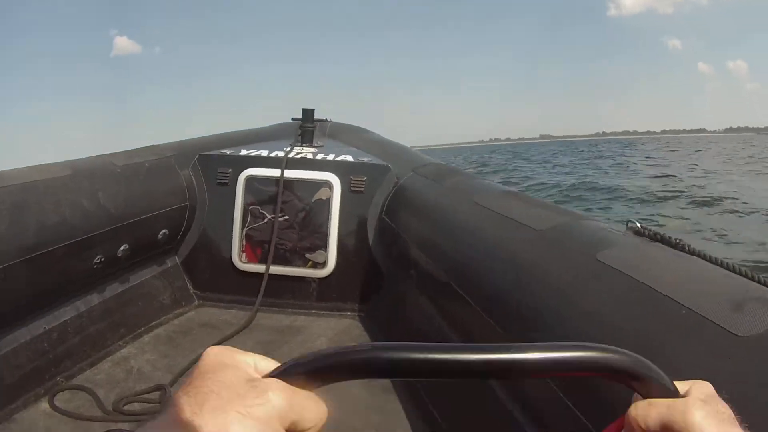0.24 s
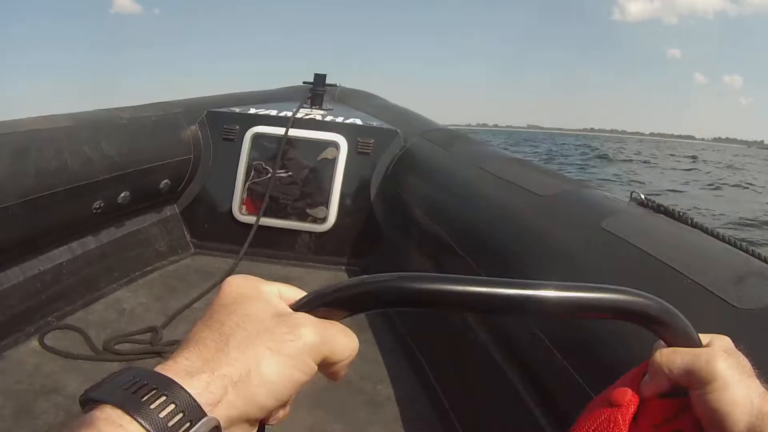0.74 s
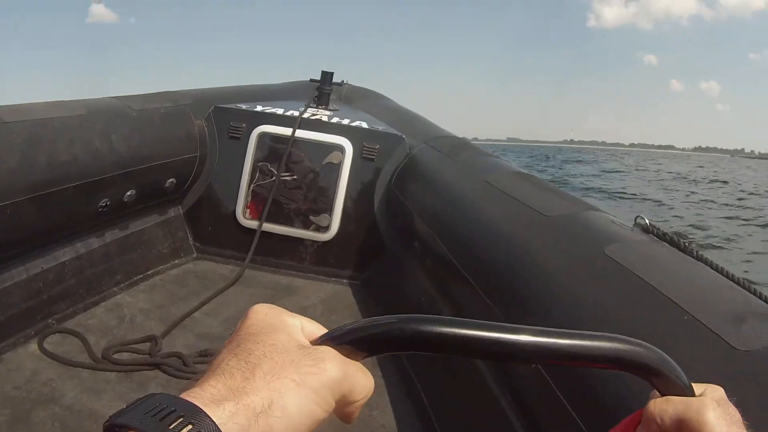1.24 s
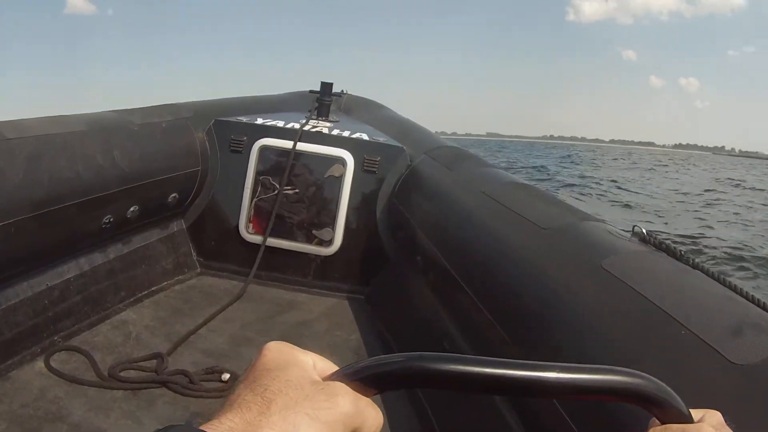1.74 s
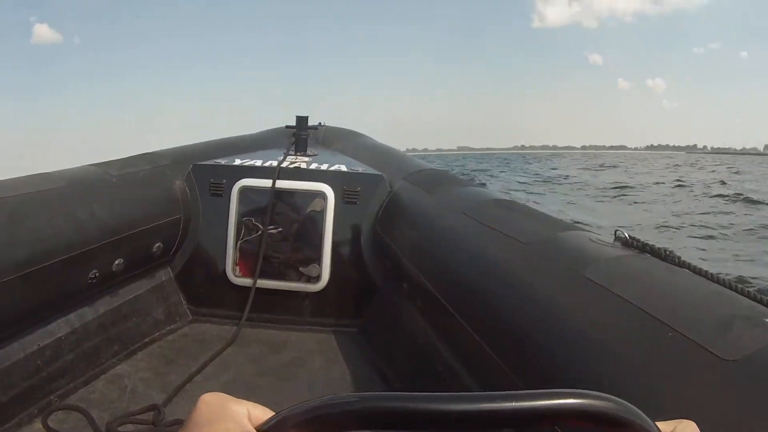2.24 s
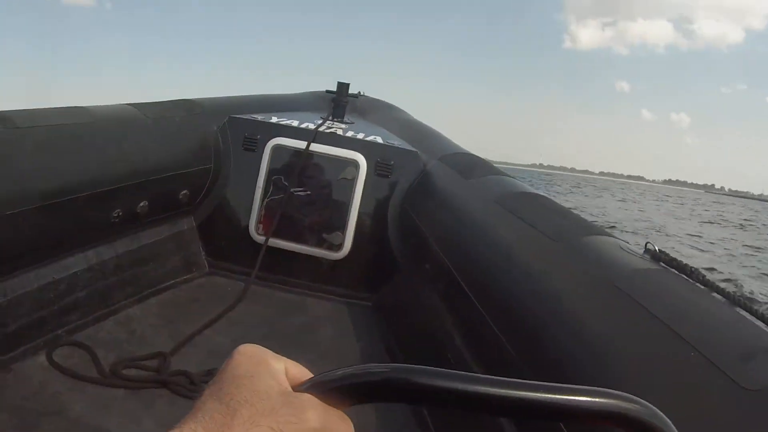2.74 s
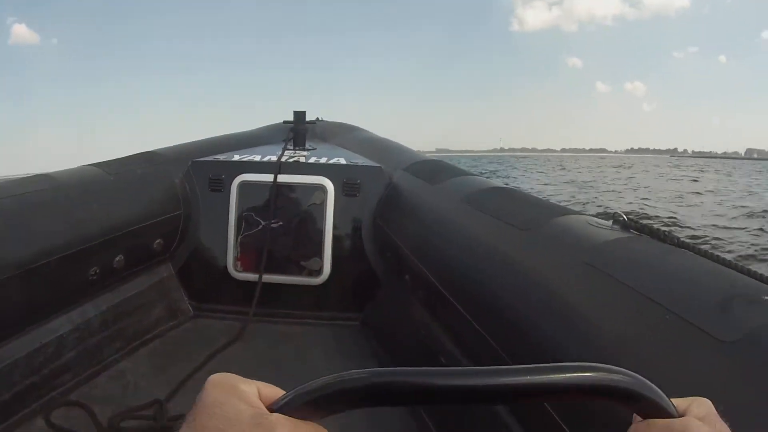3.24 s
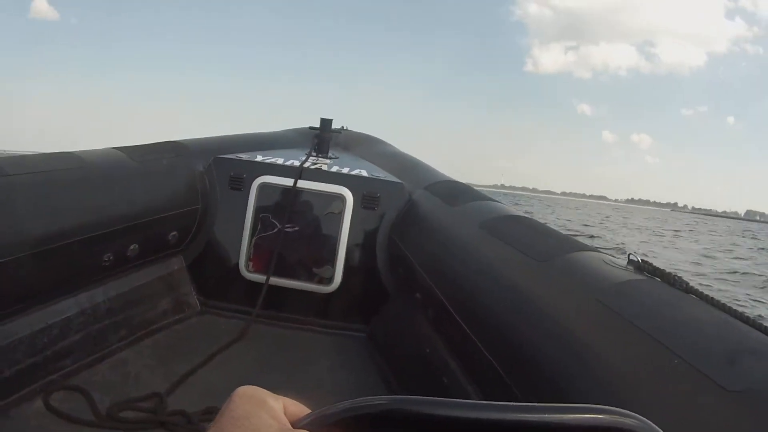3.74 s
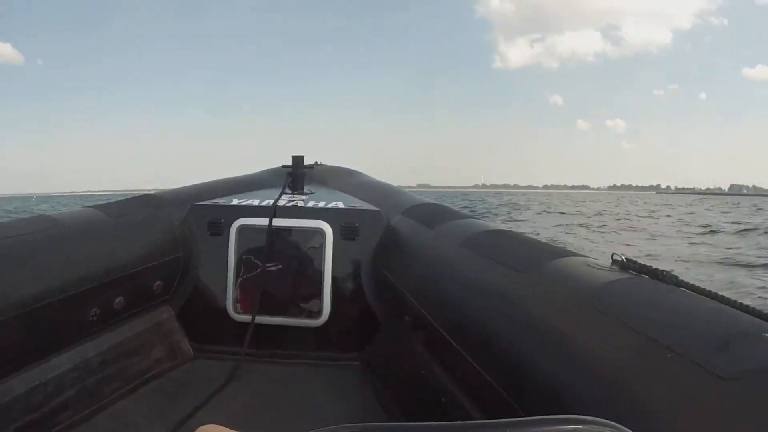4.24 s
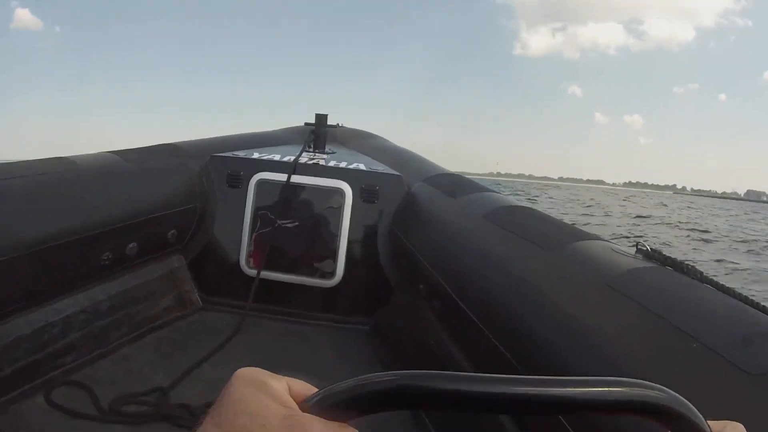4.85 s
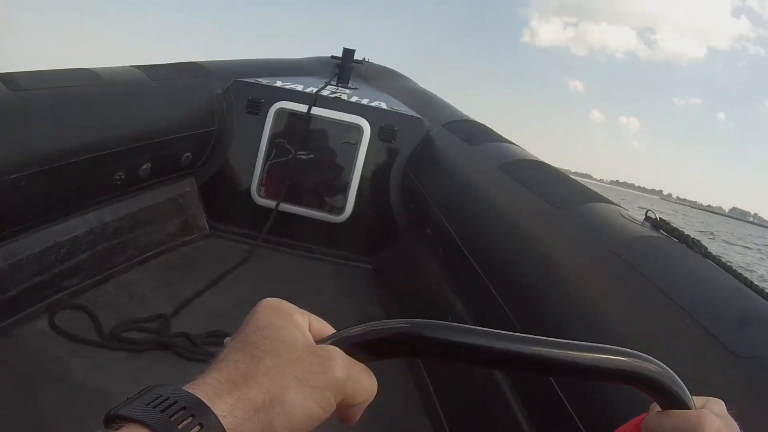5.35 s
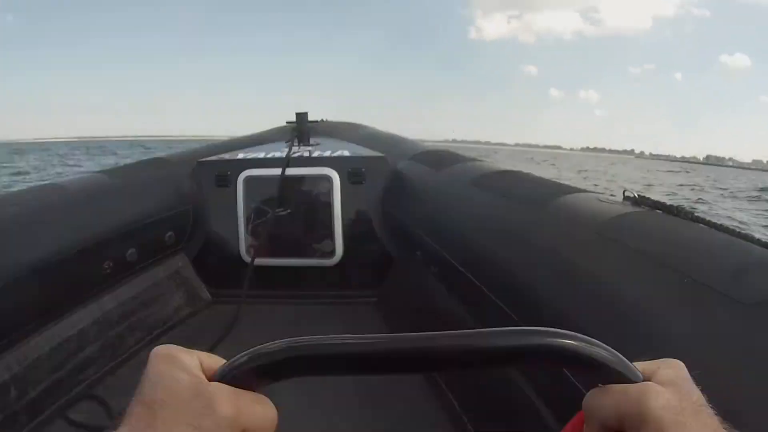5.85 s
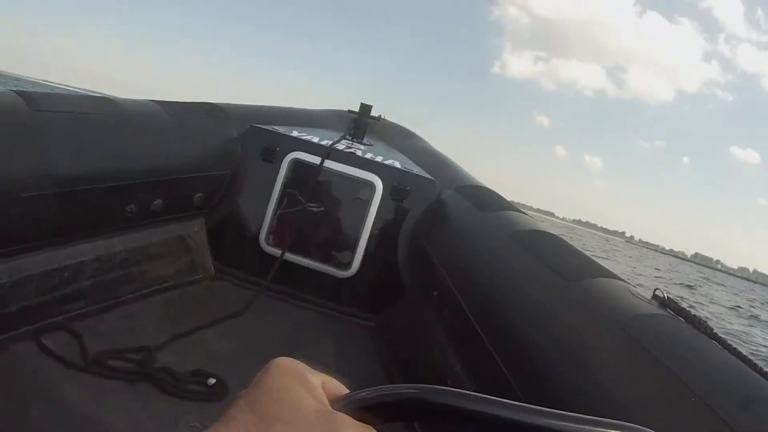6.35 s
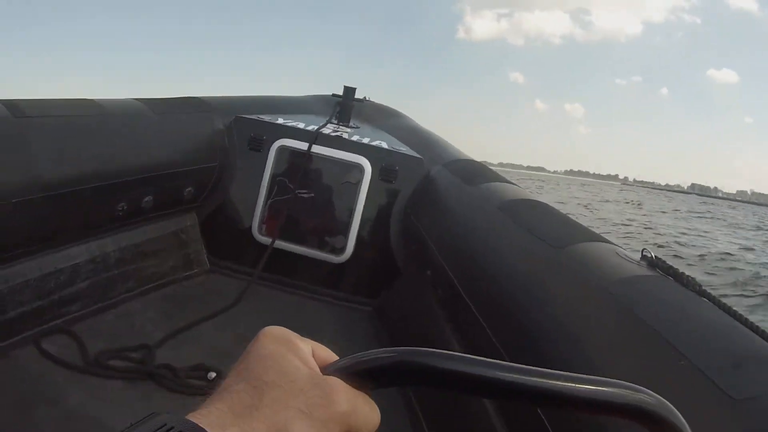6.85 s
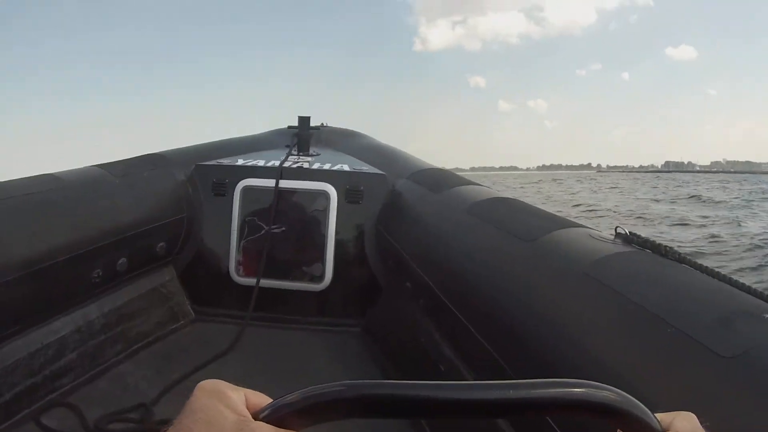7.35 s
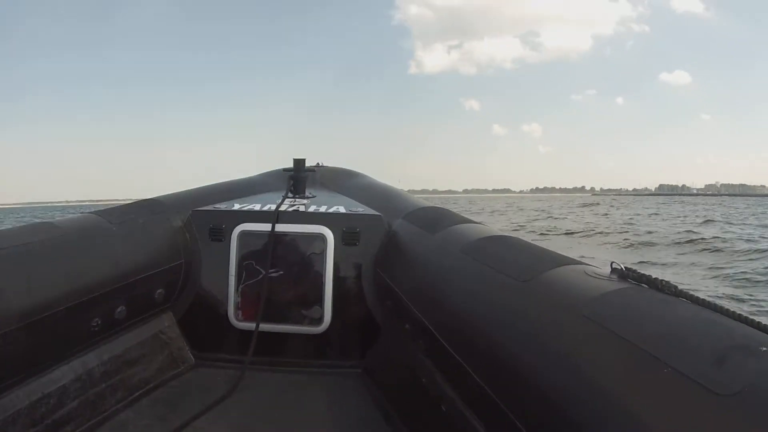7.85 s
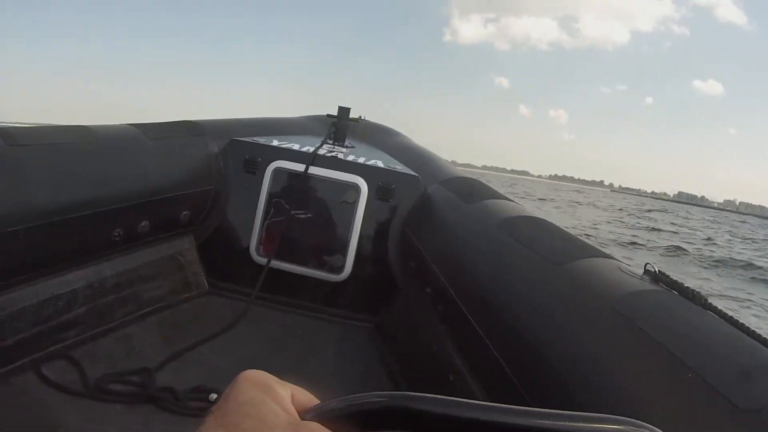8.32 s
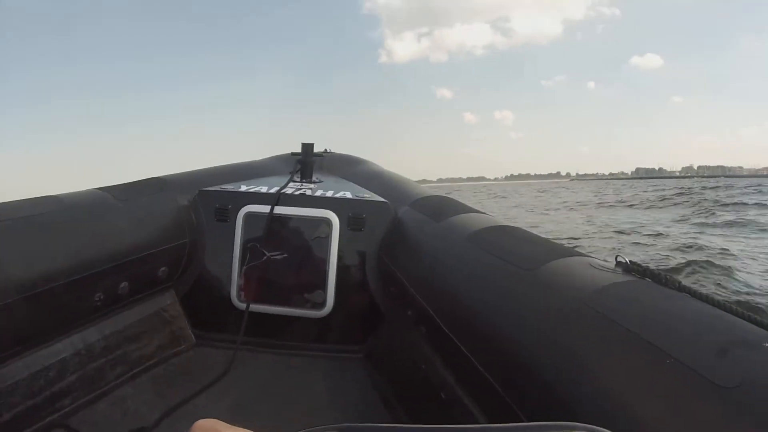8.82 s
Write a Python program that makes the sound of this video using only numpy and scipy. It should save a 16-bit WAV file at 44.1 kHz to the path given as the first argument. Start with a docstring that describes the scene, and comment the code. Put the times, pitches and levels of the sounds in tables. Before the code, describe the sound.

Inside a sealed plastic case, a small motorboat drones over muffled wind and rushing water while hard, dry, clipping knocks and hull thuds hit irregularly.

```python
"""Planing boat in chop, heard inside a waterproof case

A small planing boat runs through chop, heard by a body-worn camera shut in a waterproof case.
Shaped noise makes the wind and water, sines the outboard's hum; the case lends noise and knocks its resonances.
As the hull bounces, the case knocks on the rider's gear: dry, overloading impulses, some with a metal ring.
Water swells with each wave; hard knocks make the camera's limiter duck everything, and the drone creeps back.
"""
import sys
import numpy as np
from scipy import signal
from scipy.fft import rfft, irfft
from scipy.io import wavfile
from scipy.ndimage import uniform_filter1d

SR = 44100
rng = np.random.default_rng(int(sys.argv[2]) if len(sys.argv) > 2 else 0)


def int16_out(signal):
    """Quantize to a 16-bit WAV file."""
    q = np.round(np.clip(np.atleast_2d(signal).T, -1, 1) * 32767)
    wavfile.write(sys.argv[1], SR, q.astype(np.int16))


N = 400428
TIME = np.arange(N) / SR


def amp(db):
    """Decibels to gain."""
    return 10 ** (np.asarray(db) / 20)


def unit(x):
    """Scales to rms 1."""
    return x / np.sqrt(np.mean(x ** 2) + 1e-20)


def read(points, hz):
    """Joins (frequency [Hz], value) points on a log-frequency axis."""
    f, value = np.transpose(points)
    return np.interp(np.log(hz + 1), np.log(f + 1), value)


def curve(rows, axis):
    """One column of a time table, at every sample."""
    rows = np.array(rows)
    return np.interp(TIME, rows[:, 0], rows[:, axis])


def add(mix, s, sound):
    """Lays a sound into the mix at time s."""
    part = mix[max(round(s * SR), 0):][:len(sound)]
    part += sound[:len(part)]


def wander(hz):
    """Random drift of rms 1, rolling off steeply above hz."""
    f = np.fft.rfftfreq(N, 1 / SR)
    spectrum = rfft(rng.standard_normal(N)) / (1 + (f / hz) ** 4)
    return unit(irfft(spectrum, N))


# resonances of the plastic case: (centre [Hz], width [Hz], lift [dB])
CASE_RESONANCES = [(699, 323, 8.5), (1307, 267, 15.5), (1588, 346, 15), (2090, 467, 11.5), (2377, 464, 15),
                   (3810, 2700, 6), (4876, 680, 10), (6230, 690, 5.5), (7240, 580, 2.5)]


def case_db(hz):
    """The lift that the case's resonances give to a sound passing through it."""
    return sum(db / (1 + (2 * (hz - f) / width) ** 2) for f, width, db in CASE_RESONANCES)


def below(hz, edge_hz=950):
    """Low-frequency weighting that slides from 1 to 0 around the edge."""
    return 1 / (1 + (hz / edge_hz) ** 6)


def response(db):
    """Minimum-phase impulse response of a dB spectrum, so the energy comes early."""
    log_gain = np.log(amp(np.maximum(db, db.max() - 100)))
    circle = np.r_[log_gain, log_gain[-2:0:-1]]  # mirrored to negative frequencies
    return np.fft.ifft(np.exp(np.conj(signal.hilbert(circle)))).real


def through_case(x, tone, weight_db=0, size=4096):
    """Gives a drive signal its spectrum and the colour of the case."""
    hz = np.fft.rfftfreq(size, 1 / SR)
    spectrum_db = read(tone, hz) + case_db(hz) + weight_db * below(hz)
    return signal.fftconvolve(x, response(spectrum_db))


def swell(crest, length, rise_share=1, fall_share=0.98):
    """A rounded rise and fall of height 1; the shares scale its length before and after the crest."""
    t = (TIME - crest) / length
    side = np.where(t < 0, t / rise_share, t / fall_share)
    return np.exp(1 - np.hypot(1, 2 * side))


def surge(rows):
    """Gain of a steady flow whose power gains that of each (crest [s], level [dB], length [s]) swell."""
    return np.sqrt(1 + sum((amp(db) * swell(s, length)) ** 2 for s, db, length in rows))


# gusts on the case: (crest [s], level [dB re steady wind], length [s])
GUSTS = [(.27,4,.12), (.76,4.5,0.15), (1.15,-4.5,0.11), (1.33,7,0.066), (1.93,9.5,0.11), (2.5,3.5,.14),
         (3.08,9,0.07), (4.17,6.5,0.13), (5.1,4.5,0.28), (5.8,10.5,.1), (6.08,11.5,0.076), (6.98,11.5,.07),
         (7.2,9.5,0.09), (8.07,2.5,0.22), (8.98,2,0.25)]
# wind spectrum before the case colours it: (frequency [Hz], relative level [dB per Hz])
WIND_TONE = [(8, -6.5), (22, -5.5), (35, 3.5), (70, -4.5), (100, -4.5), (150, -9), (220, -16), (320, -26),
             (600, -46), (1500, -69.5)]


def wind(level_db=-32.5, flutter_db=2):
    """Lumpy turbulence pressing on the case: low noise with a fluttering level and gusts."""
    noise = through_case(rng.standard_normal(N), WIND_TONE)[:N]
    rumble = unit(noise * amp(flutter_db * wander(18.0)))
    return rumble * amp(level_db) * surge(GUSTS)


# waves along the hull:
# (crest [s], level [dB re calm water], length [s], extra slosh [dB], extra spray [dB])
WAVES = [(0.14,3,0.065,-20,2.5), (0.29,3.5,0.12,2,-15), (0.802,9.5,0.22,-1.5,0.5), (.915,11,0.031,-7,3),
         (1.318,11.5,0.019,4,0), (1.588,5,0.03,-10,-4), (1.93,8.5,0.047,-3,-5), (2.147,3,0.15,4,0),
         (2.391,8.5,0.074,3.5,-4), (2.586,6.5,.05,-3,1), (3.096,12.5,.06,-9,-1),
         (3.261,8.5,0.072,8.5,-19.5), (4.197,11,0.068,2,-3), (4.78,3.5,0.079,8,-16), (4.963,7.5,0.2,1,-21),
         (5.872,22.5,0.061,-6,-4.5), (6.1,17,0.14,-0.5,-7.5), (6.358,13,0.084,-4,-4),
         (6.783,2.5,0.062,4,-4.5), (7.224,10,0.09,2,-5.5), (7.504,5.5,0.029,9,-12.5),
         (7.71,10,0.089,-15,3.5), (8.084,14.5,0.075,3.5,-7), (8.253,4.5,.12,4.5,-3), (8.93,-6,0.31,6,0)]


def wave_gains():
    """Swelling gains of the rush, slosh and spray: the same waves, each with its own emphasis."""
    rush = surge([(s, db, length) for s, db, length, _, _ in WAVES])
    slosh = surge([(s, db + extra, length) for s, db, length, extra, _ in WAVES])
    spray = surge([(s, db + extra, length) for s, db, length, _, extra in WAVES])
    return rush, slosh, spray


def patter(per_s, spread_db):
    """A dense train of drop impacts, a few of them large."""
    size = amp(spread_db * np.minimum(rng.exponential(1, N), 4))
    hits = rng.random(N) < per_s / SR
    return unit(size * rng.standard_normal(N) * hits)


def mottle(x, depth_db, size=512):
    """Turbulence: patches of the spectrum swell and fade on their own."""
    z = signal.stft(x, nperseg=size)[2]
    patches = uniform_filter1d(rng.standard_normal(z.shape), 4, axis=0)  # across frequency
    patches = unit(uniform_filter1d(patches, 5, axis=1))  # across time
    return unit(signal.istft(z * amp(depth_db * patches), nperseg=size)[1][:N])


# water spectra before the case colours them: (frequency [Hz], relative level [dB per Hz])
SLOSH_TONE = [(100, -19), (220, 1.5), (300, 2), (450, -2.5), (700, -13), (1000, -11.5), (1400, -23.5),
              (3000, -65.5)]
RUSH_TONE = [(500, -18.5), (900, -11.5), (1200, -4.5), (1850, -4.5), (2400, -7.5), (2900, -6), (3700, -9),
             (5000, -37), (9000, -58)]
SPRAY_TONE = [(1500, -35.5), (3200, 4), (4300, -3.5), (5500, -3.5), (8000, -3.5), (10000, -12.5),
              (13000, -15), (15000, -22), (16500, -20.5)]
CALM_SLOSH_DB, CALM_RUSH_DB, CALM_SPRAY_DB = -44, -46, -60.5


def water(rush_gain, slosh_gain, spray_gain, fizz_db=2.1, churn_db=1.4, patchy_db=1.9, drops=0.7):
    """Slosh, rush and spray churn together and swell with each wave; drops give the upper two their grain."""
    drive = rng.standard_normal(N) + drops * patter(per_s=650, spread_db=8.0)
    slosh = mottle(through_case(rng.standard_normal(N), SLOSH_TONE), patchy_db)
    rush = mottle(through_case(drive, RUSH_TONE), patchy_db)
    spray = mottle(through_case(drive[::-1], SPRAY_TONE), patchy_db)  # reversed, so its grain differs
    slosh = slosh * amp(CALM_SLOSH_DB) * slosh_gain
    rush = rush * amp(CALM_RUSH_DB) * rush_gain
    spray = spray * amp(CALM_SPRAY_DB + fizz_db * wander(60)) * spray_gain
    return (slosh + rush + spray) * amp(churn_db * wander(22))


# outboard: (time [s], firing rate [Hz])
ENGINE = [(0, 211.9), (1.4, 214), (3.6, 215.3), (5.2, 216.1), (8.3, 216.3), (8.55, 230.9), (9.08, 239.6)]
# engine orders: (multiple of the firing rate, relative level [dB])
ENGINE_ORDERS = [(.5, -14), (1, 0.5), (2, -26.5), (4, -22.5)]


def outboard(level_db=-42, waver=0.005, throb_db=2.2):
    """Only the lowest engine orders get through the case, as sines; the throttle opens near the end."""
    rate_hz = curve(ENGINE, axis=1) * (1 + waver * wander(21))
    cycles = np.cumsum(rate_hz) / SR
    hum = sum(amp(db) * np.sin(2 * np.pi * (order * cycles + rng.random())) for order, db in ENGINE_ORDERS)
    return unit(hum) * amp(level_db + throb_db * wander(4.3))


# spectrum of taps and splashes before the case colours it: (frequency [Hz], relative level [dB per Hz])
SPLASH_TONE = [(40, -9.5), (200, -9.5), (600, -3.5), (1050, -8.5), (1850, -11), (2800, -19), (5000, -36),
               (9000, -48.5), (15000, -72)]


def taps(rush_gain, per_s=20, level_db=-13):
    """Scattered light impulses on the case, stronger when the water runs rough; level is re the calm rush."""
    impacts = rng.uniform(-1, 1, N) * (rng.random(N) < per_s / SR)
    return unit(through_case(impacts, SPLASH_TONE)[:N]) * rush_gain * amp(CALM_RUSH_DB + level_db)


def burst(db, length, tone, weight_db=0):
    """A short rounded burst of turbulence on the case, at rms level db."""
    count = max(int(length * SR), 64)
    drive = rng.standard_normal(count) * signal.windows.tukey(count, .5)
    sound = through_case(drive, tone, weight_db)
    return amp(db) * sound * np.sqrt(count / np.sum(sound ** 2))


# slaps of spray and short scuffs on the case:
# (time [s], level [dB], length [s], spectral weight below about 1 kHz [dB])
SPLASHES = [(0.151,-28.5,0.012,-3), (0.237,-26.5,0.027,20.5), (0.718,-28.5,0.027,17), (0.784,-25.5,0.034,7),
            (2.112,-32,0.017,8), (2.405,-20,0.022,12.5), (3.04,-22.5,.015,10), (3.086,-22,0.02,12),
            (3.228,-23,0.024,27), (4.74,-28,0.026,12.5), (4.947,-21,0.035,12), (5.033,-29.5,0.0089,-1),
            (5.832,-20.5,0.018,-6), (5.892,-21.5,0.027,-21), (5.958,-15,0.039,-10.5),
            (6.112,-23.5,0.014,15), (7.045,-31.5,.025,25), (8.166,-23,0.046,-6)]


def splashes():
    """Spray slaps and scuffs: short noise bursts, each with its own low-end weight."""
    out = np.zeros(N)
    for s, db, length, weight_db in SPLASHES:
        add(out, s, burst(db, length, SPLASH_TONE, weight_db))
    return out


# thuds of the hull on a wave: (time [s], level [dB], length [s])
THUDS = [(.24,-24,0.044), (0.814,-20.5,0.024), (1.556,-24.5,0.024), (2.563,-24.5,0.034), (4.142,-16,0.032),
         (5.824,-11.5,0.049), (5.897,-9,0.018), (8.054,-18,0.039)]
# hollow thud spectrum with two broad booms, before the case: (frequency [Hz], relative level [dB per Hz])
THUD_TONE = [(10, -24), (35, -3), (52, 3), (72, -2.5), (110, -11), (140, -1.5), (175, -15), (260, -20),
             (600, -33.5), (1500, -73.5)]


def thuds():
    """Dull thuds as the hull meets the chop: short bursts of low noise."""
    out = np.zeros(N)
    for s, db, length in THUDS:
        add(out, s, burst(db, length, THUD_TONE))
    return out


def disperse(x, hz=1600, width_hz=1900):
    """Bending waves cross the shell at unequal speeds (an allpass), so a knock builds over its first cycles."""
    r = np.exp(-np.pi * width_hz / SR)
    poles = [1, -2 * r * np.cos(2 * np.pi * hz / SR), r * r]
    return signal.lfilter(poles[::-1], poles, x)


def ring(modes):
    """Struck modes dying away, from (frequency [Hz], level [dB], t60 [s]) rows."""
    t = np.arange(SR // 2) / SR
    return sum(amp(db - 60 * t / t60) * np.sin(2 * np.pi * hz * t) for hz, db, t60 in modes)


# knocks on the case: (time [s], relative force [dB], hardness: lift around 2.2 kHz, a little above it [dB],
# spectral weight below about 1 kHz [dB], rebound delay [s])
KNOCKS = [(0.297,5,-8.5,-2.5,0.00063), (0.4343,-12,5,15,0.0017), (0.4429,-5,-11,-4.5,0.0011),
          (.455,19,7.5,-6.5,0.0011), (0.4611,10,-7,1,0.0007), (0.664,3,1,2.5,.00066),
          (0.7975,-1.5,1.5,9,0.0014), (1.603,16,-12.5,-20.5,0.00043), (1.6358,4,7.5,4.5,.0015),
          (1.7033,-11.5,7,12,.0015), (1.7752,-2,-14,-1,0.0007), (1.9203,5.5,7,2.5,.0013),
          (2.164,-16,4,-17,0.00041), (2.2319,-3,2.5,10,.0019), (2.4019,-10.5,2,3,0.0022),
          (2.6342,-15.5,-1,-2,0.00046), (2.661,17,3.5,-2,0.0014), (2.6729,9.5,-2,2.5,0.0013),
          (2.7725,-13,4,13,0.00029), (3.115,18.5,3.5,-1.5,0.00052), (3.3841,0,4,8,0.0023),
          (3.4614,15.5,1.5,3,0.0017), (3.572,-14.5,4,21,.0013), (4.1937,2.7,1.5,3.5,0.00051),
          (4.3094,7,-3,3.5,0.0021), (4.6134,-3,-4.5,6.5,0.0013), (4.924,-5,8,5.5,0.00061),
          (4.9671,-8,4,1,0.0014), (5.2228,-12,16.5,31,0.0011), (5.341,-7,5.5,17.5,.0019),
          (5.5181,-1,1,5.5,0.0012), (5.941,-10,5,0,0.00046), (6.0002,-6,-1.5,-14,.00132),
          (6.0101,24,-3,-20.5,0.0004), (6.0155,20,2,-8,0.00038), (6.0333,12.5,-6.5,-12,.00046),
          (6.3797,13,-6.5,-0.5,0.0013), (6.7442,18,7,-6,0.00078), (6.8725,4,5,6,0.0014),
          (6.9476,20.5,1.5,-4,.0013), (7.1664,25,3,-10,0.00088), (7.3802,7,-2,-1.5,0.0004),
          (7.4294,5.5,3.5,3,.00186), (7.477,-5,3,10,.00186), (7.6335,-1.5,-8,6,0.00036),
          (8.1123,5.5,3,2.5,0.00059), (8.1377,-6,1.5,12.5,0.0012), (8.2529,5,-1,4.5,.0014)]
# knock spectrum before the case colours it: (frequency [Hz], relative level [dB per Hz])
KNOCK_TONE = [(30, -11.5), (110, 2.5), (230, 6.5), (380, 0.5), (620, -4), (1050, -2.5), (1850, -8),
              (2800, -14), (3800, -21.5), (4600, -34), (8000, -38), (15000, -68)]
# panel modes of the case that outlast each knock: (frequency [Hz], relative level [dB], t60 [s])
PANELS = [(770, -27, .055), (1560, -27, .045), (3725, -43, .075)]


def knocks(level_db=-9, spot_db=3.0, hard_hz=2200, hard_width_hz=500, treble_share=0.057,
           rebound=0.43, bounce_s=0.0055, bounce_db=-15, flex_db=-4, size=2048):
    """Each contact is an impulse and a quick rebound, then a softer bounce; the struck spot favours some modes."""
    out, hz = np.zeros(N), np.fft.rfftfreq(size, 1 / SR)
    hard = np.maximum(np.exp(-((hz - hard_hz) / hard_width_hz) ** 2), treble_share * (hz > hard_hz))
    tone_db = read(KNOCK_TONE, hz) + case_db(hz)
    for s, force_db, hard_db, weight_db, rebound_s in KNOCKS:
        # smoothed random spectrum: the spot that is struck
        spot = unit(signal.fftconvolve(rng.standard_normal(len(hz)), signal.windows.hann(11), "same"))
        contact_db = tone_db + hard_db * hard + weight_db * below(hz) + spot_db * spot
        contact = disperse(response(contact_db))
        clack = contact.copy()
        add(clack, rebound_s, rebound * contact)  # combs the spectrum: a hollow colour for each knock
        add(clack, bounce_s, amp(bounce_db) * contact)
        onset_rms = np.sqrt(np.mean(clack[:SR // 180] ** 2))
        add(out, s, clack * amp(force_db + level_db) / onset_rms)
        add(out, s, amp(force_db + flex_db) * ring(PANELS))
    return out


# knocks that also catch the metal fitting:
# (time [s], first-mode drive [dB], second-mode drive [dB], high-mode drive [dB])
RINGS = [(.456,-11,-12,-33), (1.604,-36,-44,-48), (1.921,-33,-22,-58), (3.118,-19,-16.5,-56),
         (6.011,-26.5,-24.5,-41.5), (6.747,-25.5,-35.5,-38), (6.95,-23,-37,-42), (7.168,-18,-20,-33)]
# modes of the metal fitting: (frequency [Hz], level re its drive [dB], t60 [s])
FITTING_MODES = [(1670, 0, .16), (2135, -2, .22), (4533, -1, .25), (5146, -12, .2), (7262, -21, .45)]


def fitting():
    """A faint ring of decaying modes; where the metal is caught decides which of them sound."""
    out = np.zeros(N)
    for s, first_db, second_db, high_db in RINGS:
        drive_db = [first_db, second_db, high_db, high_db, high_db]
        modes = [(hz, db + extra_db, t60) for (hz, db, t60), extra_db in zip(FITTING_MODES, drive_db)]
        add(out, s, ring(modes))
    return out


# the limiter senses the midrange, so bright knocks slip past and overload
LIMIT_DB, RECOVER_DB_PER_S, SENSE_S, LOOK_AHEAD_S = -18, 14.5, 0.0065, 0.003
SENSE_ABOVE_HZ, SENSE_BELOW_HZ = 210, 892


def limiter(x):
    """Gain that drops at once by the excess over the limit, ignoring rumble, and recovers at a steady rate."""
    band = signal.butter(2, [SENSE_ABOVE_HZ, SENSE_BELOW_HZ], "bandpass", fs=SR)
    sensed = signal.lfilter(*band, x)
    energy, now = np.cumsum(sensed ** 2) / SR, TIME + LOOK_AHEAD_S
    power = (np.interp(now, TIME, energy) - np.interp(now - SENSE_S, TIME, energy)) / SENSE_S
    over_db = np.maximum(10 * np.log10(abs(power) + 1e-12) - LIMIT_DB, 0)
    recovery_db = RECOVER_DB_PER_S * TIME
    return amp(recovery_db - np.maximum.accumulate(over_db + recovery_db))


def scene():
    """Everything as it reaches the microphone inside the case."""
    rush_gain, slosh_gain, spray_gain = wave_gains()
    flow = wind() + water(rush_gain, slosh_gain, spray_gain) + outboard()
    contacts = taps(rush_gain) + splashes() + thuds() + knocks() + fitting()
    return (flow + contacts)[None]


def record(dry, ceiling=1.0, edge_hz=15000):
    """The limiter ducks the mix, peaks still over the ceiling are clipped, then a lowpass ends the treble."""
    ducked = dry * limiter(dry[0])
    clipped = ducked / (1 + (ducked / ceiling) ** 8) ** (1 / 8)
    lowpass = signal.firwin(255, edge_hz, window=("kaiser", 9), fs=SR)
    return signal.oaconvolve(clipped, lowpass[None], "same")


dry = scene()
out = record(dry)
int16_out(out)
```